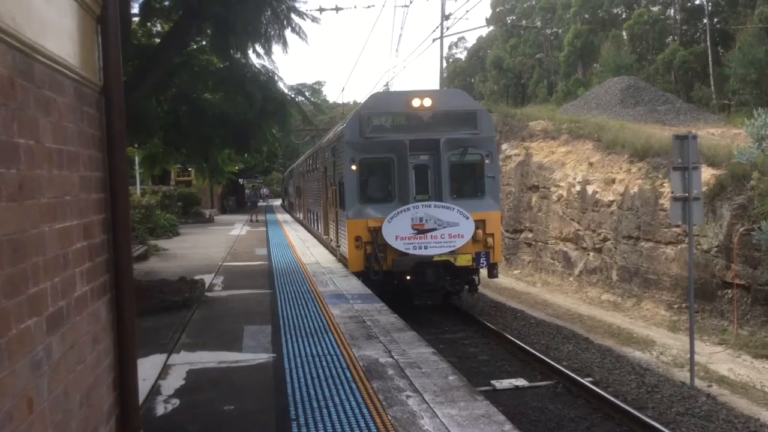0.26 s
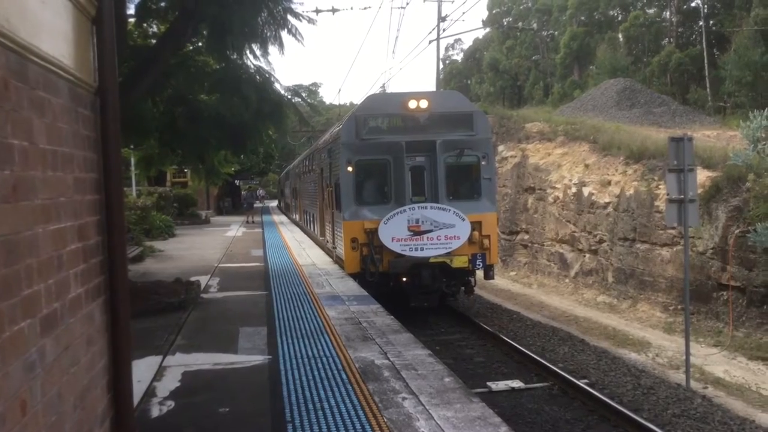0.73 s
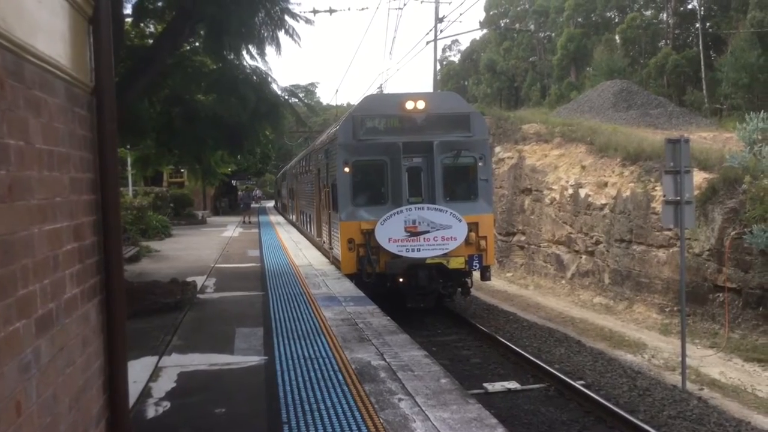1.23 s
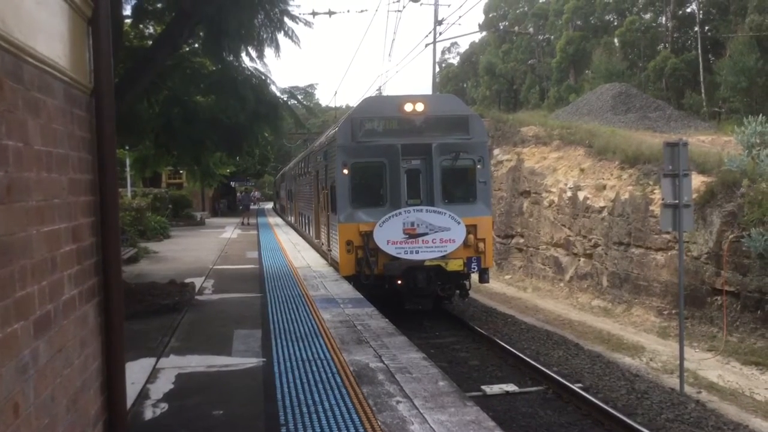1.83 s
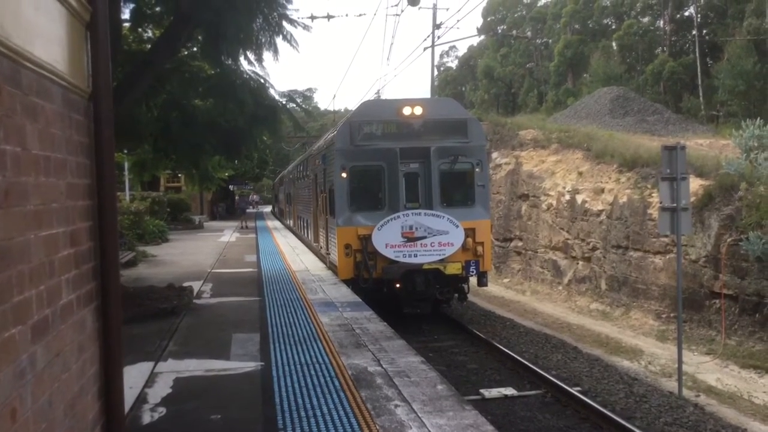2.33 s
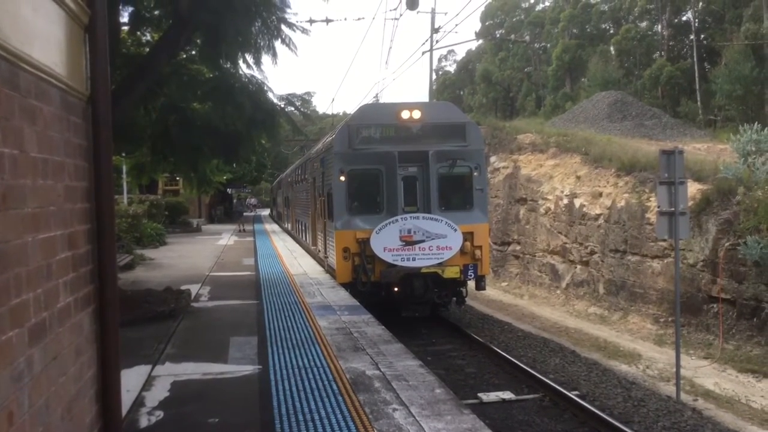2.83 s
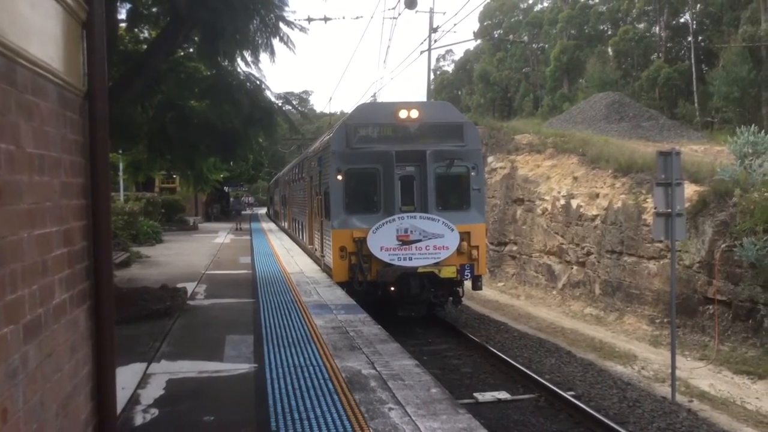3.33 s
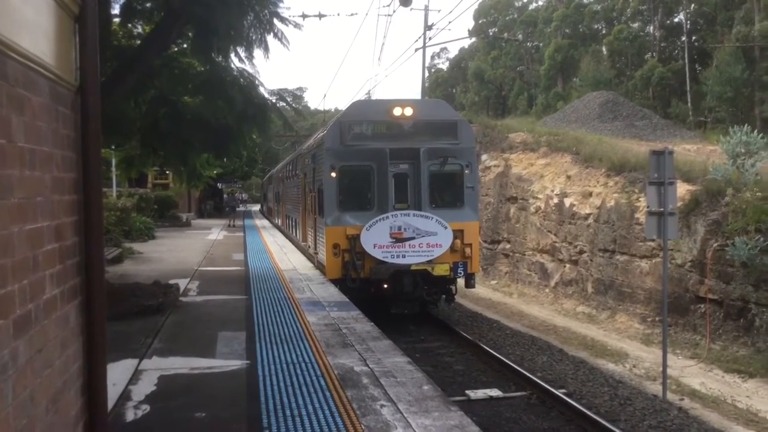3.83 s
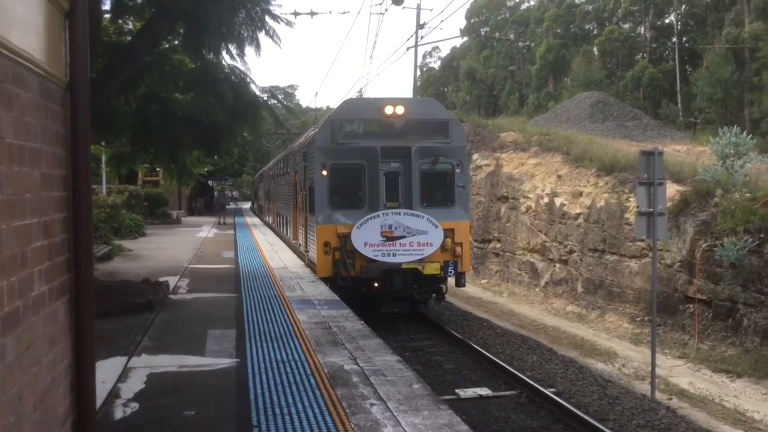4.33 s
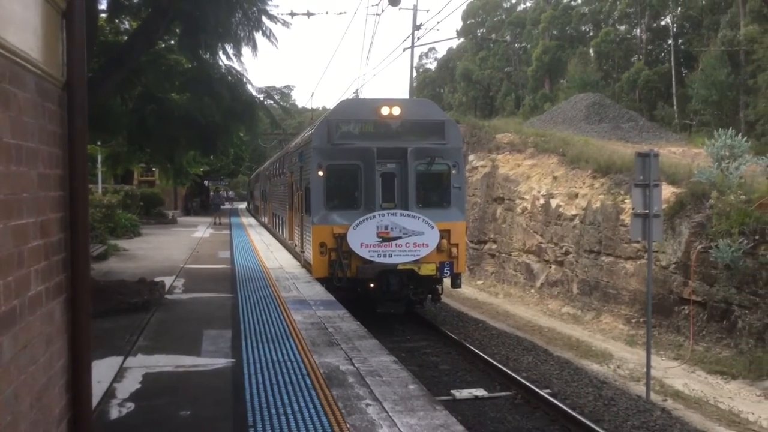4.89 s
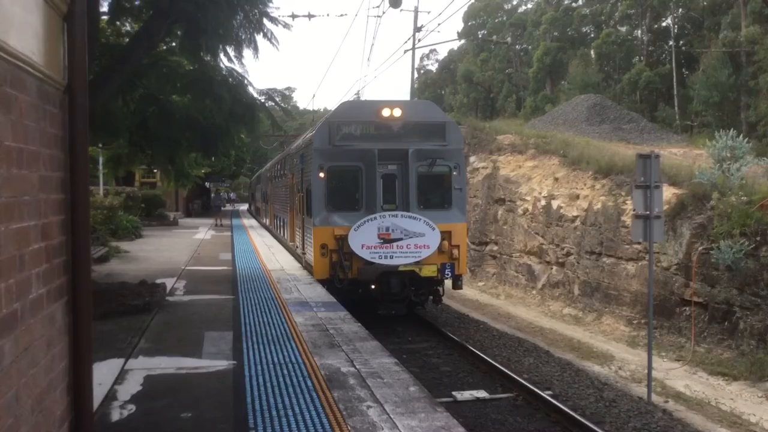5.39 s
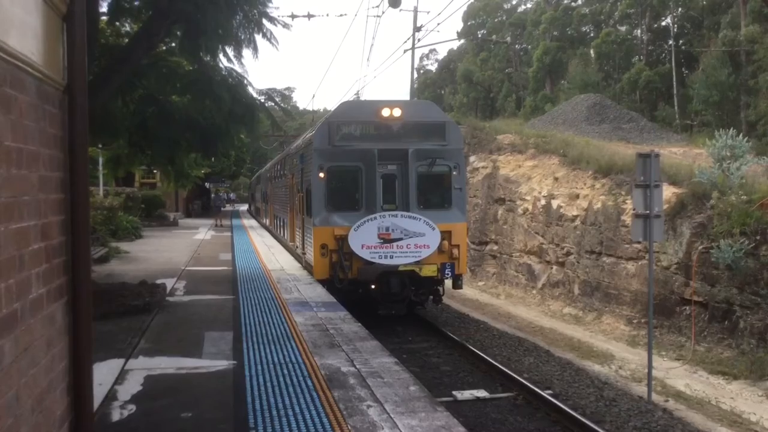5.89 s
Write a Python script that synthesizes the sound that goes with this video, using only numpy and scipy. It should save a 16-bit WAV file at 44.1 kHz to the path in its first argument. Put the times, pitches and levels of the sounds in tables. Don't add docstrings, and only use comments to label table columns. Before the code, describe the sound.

An idling electric train hums and roars low at a breezy outdoor platform, vents a long fading air hiss, while a bird whistles quick rising phrases.

```python
import sys
import numpy as np
from scipy import signal
from scipy.fft import rfft, irfft, next_fast_len
from scipy.io import wavfile
from scipy.ndimage import uniform_filter1d

SR = 44100
rng = np.random.default_rng(int(sys.argv[2]) if len(sys.argv) > 2 else 0)


def put_to_file(sound):
    columns = np.atleast_2d(sound).T
    safe = np.clip(columns, -1, 1)
    whole_steps = np.round(safe * 32767)
    wavfile.write(sys.argv[1], SR, whole_steps.astype(np.int16))


def ratio(d):
    e = np.asarray(d, float) / 20
    return 10 ** e


N = 271215
TIME = np.arange(N) / SR
SHAFT_HZ = 24.78

# time_s, gust_db
BREEZE_GUSTS = [
    (0, -38.5),
    (1.0, -40.5),
    (2.6, -52),
    (3.5, -40),
    (4.6, -42),
    (5.0, -44),
    (6.15, -30.5),
]
# centre_s, peak_db, pitch_hz
WIND_BUFFETS = [(0.282, -27, 106), (0.585, -27.5, 95), (.76, -34, 70), (0.884, -36.5, 109),
                (1.351, -36.5, 139), (1.495, -35.5, 91), (2.139, -39, 96), (2.25, -34, 100),
                (2.43, -32, 88.7), (3.11, -33, 99), (3.7, -30, 99), (3.881, -33.5, 70.1),
                (4.349, -22, 77.3), (4.431, -28.5, 95), (4.685, -31.5, 102), (4.8, -36, 102),
                (5.039, -28, 93), (5.399, -31, 90), (6.051, -31.5, 124)]
# frequency_hz, density_db [dB per Hz]
ROAR_SPECTRUM = [(15, -44), (25, -12), (86, -2), (129, -3.5), (253, -4.5), (349, -12), (421, -22.5),
                 (509, -20), (741, -19.5), (826, -28.5), (1410, -28), (2170, -28), (3150, -39),
                 (3830, -43.5), (4900, -45.5), (7500, -49), (13500, -57), (15500, -83)]
# centre_hz, width_hz, height_db
DUCT_HUMPS = [(95, 16, 3.5), (347, 12, 0.5), (495, 68, 4.5), (1392, 100, 4.5), (2130, 65, 4),
              (2600, 190, 2.5), (3000, 660, -0.5)]
# time_s, pitch_hz, peak_db
SONG_PHRASES = [
    [(2.41, 3120, -69), (2.44, 3280, -55), (2.481, 3620, -58), (2.516, 3770, -61)],
    [(2.652, 3220, -62), (2.669, 3290, -56), (2.70, 3590, -54), (2.74, 3950, -56), (2.761, 3975, -57)],
    [(2.93, 3330, -69), (2.955, 3520, -62), (2.98, 3900, -57), (3.006, 4150, -54)],
    [(3.18, 3440, -63), (3.205, 3575, -65), (3.223, 3910, -57), (3.25, 4180, -54)],
    [(3.41, 3420, -66), (3.443, 3590, -60), (3.473, 3910, -56), (3.502, 4260, -53)],
    [(3.72, 3430, -66), (3.735, 3600, -64), (3.752, 3910, -59), (3.775, 4160, -54)],
]
# centre_s, pitch_hz, peak_db, half_length_s
STRAY_CHIPS = [
    (3.857, 3020, -60, .022),
    (3.165, 7560, -67, .035),
    (3.197, 7420, -59.5, .025),
]
# centre_s, pitch_hz, peak_db, half_length_s
ROCK_RETURNS = [(2.57, 3780, -64, .03), (2.79, 3990, -64, .035), (2.835, 3990, -63, .035),
                (3.085, 4140, -68, .04), (3.32, 4150, -68, .04), (3.59, 4230, -70, .06),
                (3.65, 4250, -70, .03), (3.04, 4125, -64, .04), (3.29, 4110, -66, .03),
                (3.35, 4080, -63, .015), (3.54, 4260, -69, .03), (3.808, 4100, -64, .014),
                (3.85, 4130, -71, .03), (3.89, 4130, -67, .03)]
# start_s, level_db [rms], length_s, low_hz, high_hz
NOISE_PUFFS = [(0.251, -54.5, 0.06, 870, 2500), (.965, -66, 0.07, 4300, 4700),
               (2.958, -62, .022, 5200, 12000), (5.541, -54, 0.018, 1000, 1350),
               (5.35, -58, .025, 1400, 1600), (3.327, -52.5, 0.073, 890, 2450),
               (3.336, -58, 0.043, 3400, 9100), (6.03, -65.5, .03, 6000, 8600),
               (.962, -56, .07, 5500, 6500), (4.641, -72, 0.73, 5600, 6600),
               (1.2417, -44, 0.001, 12800, 15700), (1.2417, -52, .001, 8000, 12500),
               (1.2431, -54, .0012, 9000, 14000), (6.0785, -64, .002, 7500, 13000),
               (6.115, -66, .002, 8000, 12000), (6.135, -59, .004, 3500, 12500),
               (6.11, -67, .05, 3500, 8000), (6.143, -54, .016, 1500, 12500),
               (5.995, -72, .025, 11100, 11300), (.958, -59, 0.044, 9000, 14000),
               (1.07, -61, .025, 5300, 6300), (1.3, -61, .07, 4800, 5800), (0.99, -63, .03, 4600, 5600),
               (1.32, -66, .04, 5700, 6400), (3.15, -68, .09, 7250, 7600), (3.0, -71, 0.27, 7200, 12000),
               (4.66, -76, 0.43, 11000, 12000)]
# pitch_hz, level_db, t60_s
CLINK_MODES = [(5400, -13, .06), (5790, -12, .05), (6720, -1, .03), (6950, -7, .02), (8590, -9, .025),
               (9230, -6, .025), (9850, -4, .022), (11000, -14, .02), (12050, -8, .03)]
# centre_s, pitch_hz, peak_db, half_length_s
BUMP_TONES = [
    (3.365, 155, -29, 0.033),
    (3.368, 271, -34.5, 0.05),
    (3.388, 206, -32.5, 0.034),
    (3.40, 102.4, -36, 0.157),
    (3.42, 202, -27, 0.03),
    (3.435, 126, -36, 0.041),
    (5.07, 495, -48, 0.17),
]
# time_s, jet_db
VENT_LEVEL = [
    (.958, -56),
    (.98, -51.5),
    (1.07, -55.5),
    (2.05, -61),
    (2.5, -63),
    (4.62, -69.5),
    (4.7, -68),
    (5.27, -70),
    (5.8, -80),
]
# frequency_hz, density_db [dB per Hz]
JET_CORE = [(3300, -16), (4200, -17), (4500, -15), (5200, -7.5), (5900, -5.5), (6900, -2), (7700, -6.5),
            (8800, -13), (10500, -29)]
# frequency_hz, density_db [dB per Hz]
JET_BRIGHT = [(6500, -22), (8500, -2.5), (9500, -4), (11200, 0), (12800, -3.5), (13500, -16), (14000, -22),
              (14800, -11.5), (15650, -19)]
# shaft_multiple, level_db [rms]
HUM_ORDERS = [(4, -54.5), (8, -54), (9, -56.5), (10, -50), (12, -63.5), (14, -57), (15, -67), (16, -65.5),
              (17, -101), (18, -68.5), (20, -76), (25, -62.5), (27, -72.5), (28, -68), (29, -67.5),
              (30, -76.5), (36, -83.5)]
# pitch_hz, level_db [rms], wander_hz
MACHINE_WHINES = [(140, -62, 1.87), (3016, -82, 4), (10944, -95, 16)]
# frequency_hz, threshold_db [over the local level]
GATE_THRESHOLD = [(1500, -14), (2800, -1), (4000, 4), (5200, 4.5), (6500, 3.5), (9000, 5.5), (12500, 5.5),
                  (13300, 9), (14100, 12), (14500, 8), (15700, 7)]


def rms_one(x):
    return x / np.sqrt(np.mean(x ** 2) + 1e-20)


def band(x, order, edges_hz, kind="band"):
    return signal.sosfilt(signal.butter(order, edges_hz, kind, fs=SR, output="sos"), x)


def in_time(rows):
    s, level = np.transpose(rows)
    return np.interp(TIME, s, level)


def drift(rate):
    r = np.exp(-80 * np.pi * rate / SR)
    noise = rng.standard_normal(N // 40 + 2002)
    slow = signal.lfilter([1], [1, -2 * r, r * r], noise)[2000:]
    return np.interp(np.arange(N) / 40, np.arange(len(slow)), rms_one(slow - slow.mean()))


def airy_noise(spectrum, humps, patchy_db, patch_rate, count=1):
    size = next_fast_len(N)
    hz = np.arange(size // 2 + 1) * SR / size + 1
    table_hz, table_db = np.transpose(spectrum)
    level_db = np.interp(np.log(hz), np.log(table_hz), table_db, right=-120)
    for centre_hz, width_hz, hump_db in humps:
        level_db = level_db + hump_db / (1 + (2 * (hz - centre_hz) / width_hz) ** 2)
    coloured = rfft(rng.standard_normal(size)) * ratio(level_db)
    octave = np.log2(hz)
    out = np.zeros(N)
    for k in np.arange(4 if count == 1 else 11, 14.5, 1 / count):
        share = np.clip(1 - count * np.abs(octave - k), 0, 1)
        out += irfft(coloured * share, size)[:N] * ratio(patchy_db * drift(patch_rate))
    return rms_one(out)


def pips(rows, rise_hz_per_s):
    out = np.zeros(N)
    for centre, hz, peak_db, length in rows:
        near = slice(max(round((centre - length) * SR), 0), round((centre + length) * SR))
        t = TIME[near] - centre
        swell = np.cos(.5 * np.pi * t / length) ** 4
        cycles = hz * t + .5 * rise_hz_per_s * t ** 2
        out[near] += ratio(peak_db) * swell * np.cos(2 * np.pi * cycles)
    return out


def wind():
    low = band(rng.standard_normal(N), 2, [45, 130])
    return ratio(in_time(BREEZE_GUSTS) - 7.0) * rms_one(low * ratio(3.6 * drift(19.0)))


def buffets():
    lumps = [(s, hz, db, 0.032 * ratio(-.6 * (db + 33))) for s, db, hz in WIND_BUFFETS]
    return pips(lumps, 0)


def phrase(notes):
    edge_s, edge_db, scoop_hz = .02, -22, 100
    dip_db_per_s = 350
    note_step = .35
    s, hz, peak_db = np.transpose(notes)
    s = np.r_[s[0] - edge_s, s, s[-1] + edge_s]
    hz = np.r_[hz[0] - scoop_hz, hz, hz[-1]]
    peak_db = np.pad(peak_db, 1, "edge")
    first, places = round(s[0] * SR), np.arange(len(s))
    last = places[-2]
    note = np.interp(TIME[first:round(s[-1] * SR)], s, places)
    inner = (note > 1) & (note < last)
    gap_s = np.diff(s)[np.minimum(note.astype(int), last)]
    dip_db = dip_db_per_s * gap_s * np.sin(np.pi * note) ** 2
    edge = np.clip(1 - note, 0, 1) + np.clip(note - last, 0, 1)
    level_db = np.interp(note, places, peak_db) - inner * dip_db + edge_db * edge ** 1.5
    stepped = note - note_step * np.sin(2 * np.pi * note) / (2 * np.pi)
    pitch_hz = np.interp(stepped, places, hz)
    return first, ratio(level_db) * np.sin(2 * np.pi * np.cumsum(pitch_hz) / SR)


def bird():
    trees_t60_s, trees_db = .8, -8.5
    flutter = 1 + .36 * rms_one(uniform_filter1d(rng.standard_normal(N), size=130))
    out = pips(STRAY_CHIPS, 4400) + ratio(-3.0) * flutter ** 2 * pips(ROCK_RETURNS, 0)
    t = TIME[:SR // 2]
    for notes in SONG_PHRASES:
        first, song = phrase(notes)
        song = song * flutter[first:first + len(song)]
        echoes = rng.standard_normal(len(t)) * ratio(-60 * t / trees_t60_s) * (1 - np.exp(-t / 0.011))
        tail = signal.fftconvolve(song, echoes)
        tail_gain = ratio(trees_db) * np.sqrt(np.sum(song ** 2) / np.sum(tail ** 2))
        out[first:first + len(song)] += song
        out[first:first + len(tail)] += tail_gain * flutter[first:first + len(tail)] * tail
    return out


def puffs():
    out = np.zeros(N)
    for start, level_db, length, low_hz, high_hz in NOISE_PUFFS:
        t = TIME[:round(length * SR)]
        noise = band(rng.standard_normal(SR), 4, [low_hz, high_hz])
        swell = np.sin(np.pi * (t / length) ** 0.54)
        burst = ratio(level_db) * rms_one(noise[-len(t):]) * swell
        at = round(start * SR)
        out[at:at + len(t)] += burst[:N - at]
    return out


def clink():
    t = np.clip(TIME - 2.9615, 0, None)
    rings = sum(ratio(db - 60 * t / t60) * np.sin(2 * np.pi * hz * t) for hz, db, t60 in CLINK_MODES)
    rings = rings * (1 - np.exp(-t / 0.00033))
    second = ratio(-5) * np.roll(rings, round(.007 * SR))
    return ratio(-48) * (rings + second)


def bumps():
    return pips(BUMP_TONES, 0)


def vent():
    since = np.clip(TIME - .958, 0, None)
    bright_db = -7.5 + 6.5 * np.exp(-since / 0.57) + 1.08 * since
    opening = np.clip(since / 0.0098, 0, 1)
    whistles = [(6990, 58, 4.5), (6700, 27, 3.3), (6050, 81, 3.7)]  # centre_hz, width_hz, height_db
    core = airy_noise(JET_CORE, whistles, patchy_db=2.0, patch_rate=45.0, count=4)
    top = airy_noise(JET_BRIGHT, [(10960, 240, 1.8)], patchy_db=1.2, patch_rate=14.0, count=4)
    return opening * ratio(in_time(VENT_LEVEL)) * (core + ratio(bright_db) * top)


def roar():
    air = airy_noise(ROAR_SPECTRUM, DUCT_HUMPS, patchy_db=1.2, patch_rate=14.0)
    low = band(air, 1, 700, "low")
    throb = .16 * np.sin(2 * np.pi * SHAFT_HZ * TIME)
    return ratio(-40.5) * (air + throb * low)


def hum():
    turns = np.cumsum(SHAFT_HZ * (1 + 0.00074 * drift(0.95))) / SR
    out = np.zeros(N)
    for order, db in HUM_ORDERS:
        out += ratio(db + 3.12 * drift(4.8)) * np.sin(2 * np.pi * (order * turns + rng.random()))
    for hz, db, wander_hz in MACHINE_WHINES:
        cycles = np.cumsum(hz + wander_hz * drift(4.44)) / SR
        out += ratio(db + 3.5 * drift(5.0)) * np.sin(2 * np.pi * cycles)
    return np.sqrt(2) * out


def scene():
    air = wind() + buffets()
    train = bumps() + clink() + vent() + roar() + hum()
    return (air + bird() + puffs() + train)[None]


def sharp_moments(x):
    bright = uniform_filter1d(band(x, 6, 13500, "high") ** 2, size=64)
    sudden = bright > 14 * uniform_filter1d(bright, size=4096)
    widened = uniform_filter1d(1. * sudden, size=400) > 1e-6
    return uniform_filter1d(1. * widened, size=200)


def spectral_gate(x):
    half, lead = 1024, 300
    sharp = sharp_moments(x)
    n, k = np.arange(2 * half)[:, None] + .5, np.arange(half) + .5
    window = np.sin(np.pi * n / (2 * half))
    basis = window * np.cos(np.pi / half * (n + half / 2) * k) * np.sqrt(2 / half)
    padding = (half + lead, 2 * half - (N + lead) % half)
    blocks = np.pad(x * (1 - sharp), padding).reshape(-1, half)
    lines = np.hstack([blocks[:-1], blocks[1:]]) @ basis
    hz = k * SR / (2 * half)
    near = uniform_filter1d(lines ** 2, size=24)
    below = uniform_filter1d(lines ** 2, size=200, origin=90)
    masked = near + (hz > 12000) * ratio(-6) ** 2 * below
    chance = uniform_filter1d(rng.standard_normal((len(lines), half // 16)), size=4, axis=0)
    uneven_db = np.where(hz > 13000, 8.0, 2.5) * np.repeat(chance, 16, axis=1)
    threshold_db = np.interp(hz, *np.transpose(GATE_THRESHOLD))
    step = np.sqrt(masked + 1e-16) * ratio(threshold_db + uneven_db)
    frames = (lines * (np.abs(lines) > step / 2)) @ basis.T
    gated = (frames[1:, :half] + frames[:-1, half:]).ravel()[lead:lead + N]
    return sharp * x + gated


def roll_off(x):
    return signal.sosfilt(signal.butter(12, 15700, fs=SR, output="sos"), x)


def record(dry):
    cut = band(dry[0], 4, 42, "high")
    mix = spectral_gate(cut)[None]
    return roll_off(mix)


dry = scene()
out = record(dry)
put_to_file(out)
```